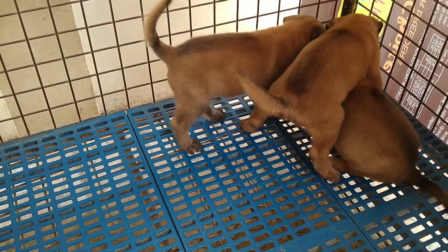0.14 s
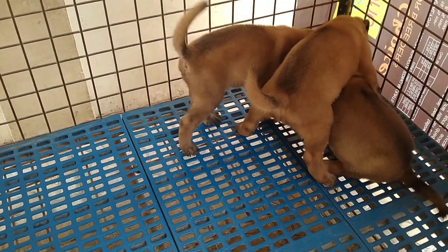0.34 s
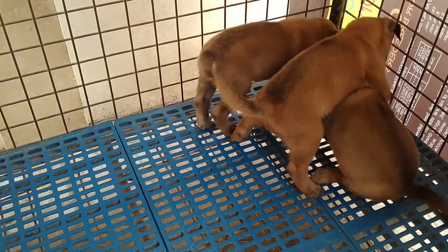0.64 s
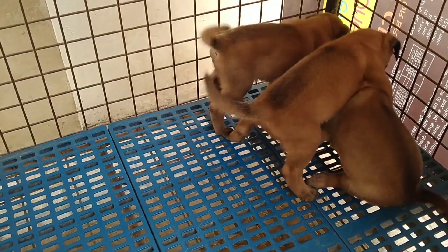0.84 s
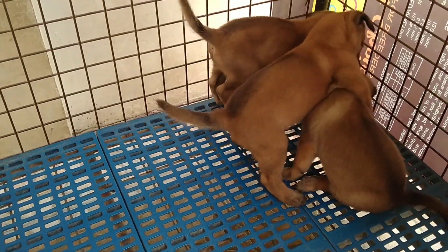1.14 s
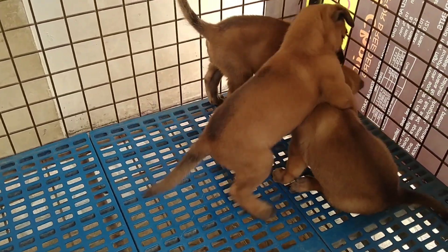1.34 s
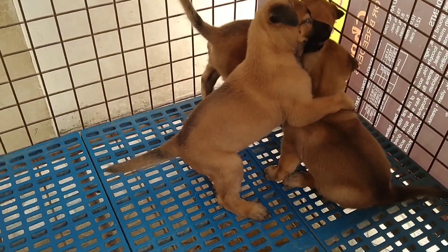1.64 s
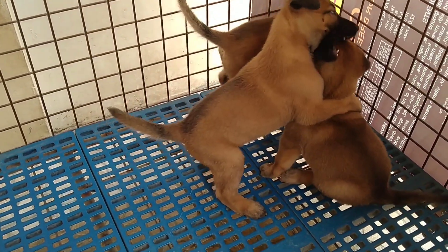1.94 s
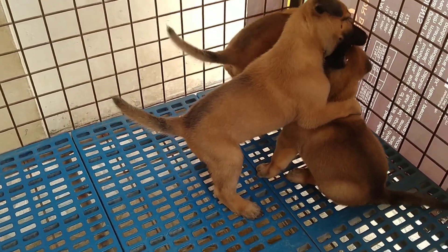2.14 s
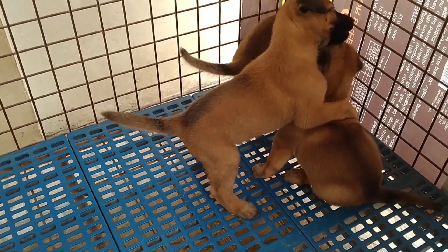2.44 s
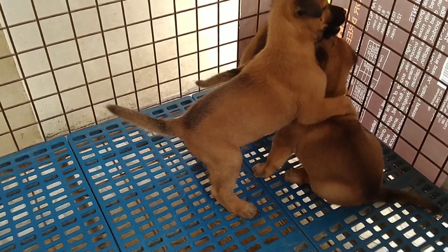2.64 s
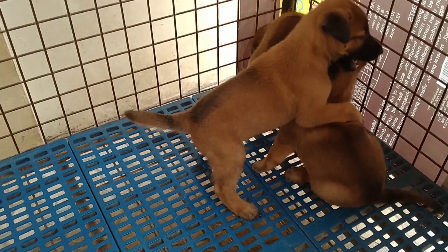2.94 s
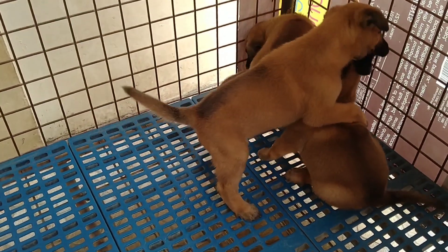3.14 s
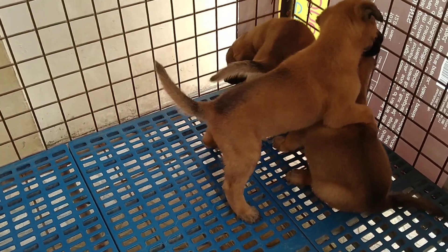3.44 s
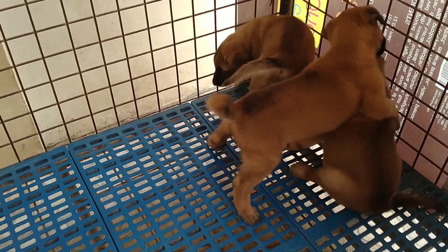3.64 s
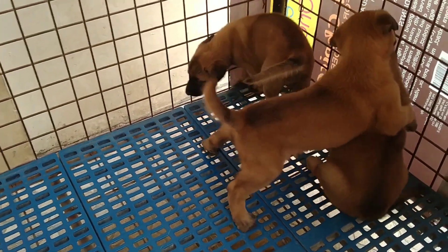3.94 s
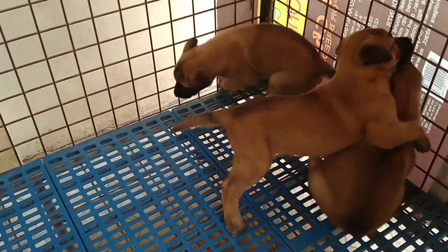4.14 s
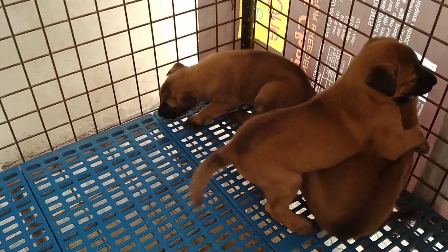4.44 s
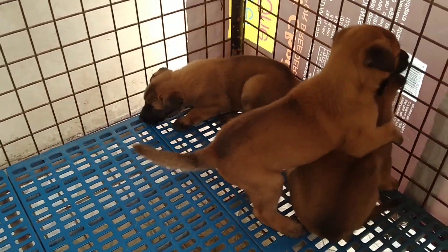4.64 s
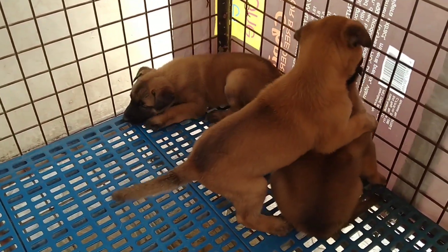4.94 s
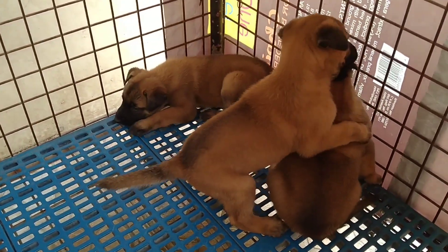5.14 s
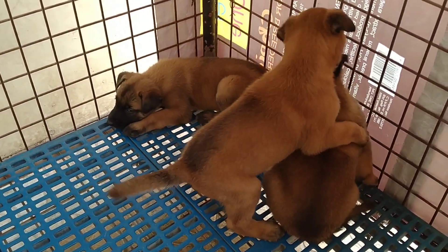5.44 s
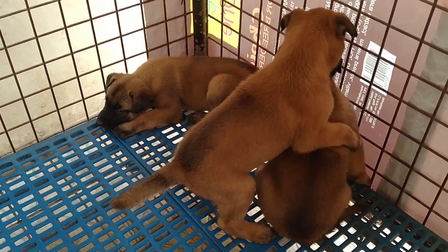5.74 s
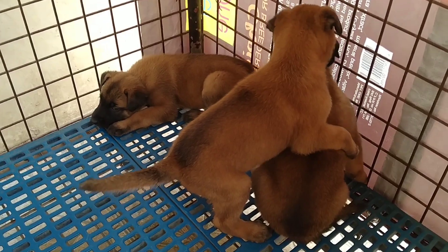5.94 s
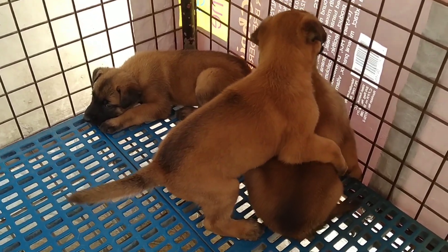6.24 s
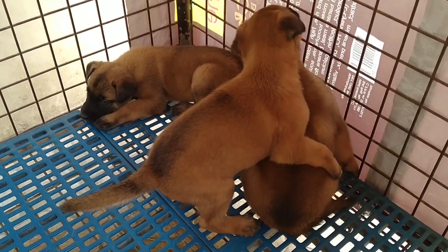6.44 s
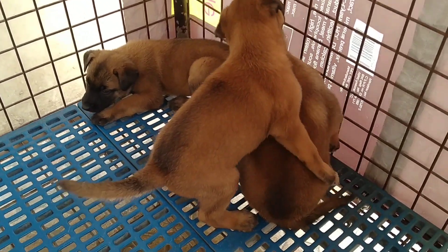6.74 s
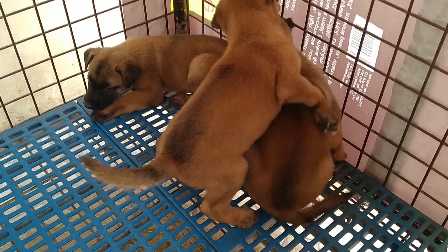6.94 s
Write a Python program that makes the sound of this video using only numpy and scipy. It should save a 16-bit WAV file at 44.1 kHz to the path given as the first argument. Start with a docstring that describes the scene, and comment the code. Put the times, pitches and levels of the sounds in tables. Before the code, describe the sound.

Low room rumble and faint hiss lie under a close view of puppies in a wire cage on a slatted plastic floor. For the first 2.5 seconds there are only light scuffs, a brighter scratch near 1.0, and barely audible squeaks. At about 2.6 a soft, toneless growl comes, with a thin high whistle. Short arching whines follow at 3.0 and 3.3, the second breaking hoarsely downward. Around 3.8 a hard, hollow double knock strikes the floor. A brief higher yelp sounds at 4.35, then growling and a broken, wavering whimper from 4.5 to 5.0 with a low floor rub. Weaker whimpers come at 5.2 and 5.65. Loud, clear whines arch up and fall at 6.0 and 6.4, with a small knock during the second; a softer one at 6.8 drops lower to end at about 7.1. A small room gives short reflections.

```python
"""A puppy whines in arching calls, with growls, squeaks, and paws that scuff, rub and knock on a plastic floor.
The voice is nearly a sine wave with weak harmonics. A thin whistle near 8-9 kHz is chopped by that voice.
Growls, hoarseness and scuffs are shaped noise; knocks are clicks followed by short floor rings.
A wire cage rings along, a small room answers, and low rumble and faint hiss lie underneath."""
import sys
import numpy as np
from scipy import signal
from scipy.fft import rfft, irfft, next_fast_len
from scipy.io import wavfile
from scipy.ndimage import uniform_filter1d, map_coordinates

SR = 44100
rng = np.random.default_rng(int(sys.argv[2]) if len(sys.argv) > 2 else 0)


def waveform_to_disk(signal):
    """Save audio, clipped to [-1, 1], as 16-bit WAV at the path in sys.argv[1]."""
    frames = np.transpose(np.atleast_2d(signal))
    scaled = np.clip(frames, -1, 1) * 32767
    samples = np.round(scaled).astype(np.int16)
    wavfile.write(sys.argv[1], SR, samples)


N = 312228  # length of the scene [samples]

# Colour of the low room rumble and the booming floor: (frequency [Hz], relative level [dB])
RUMBLE_COLOUR = [(35, -49.5), (60, -22.5), (110, -2), (170, -3), (260, -9.5), (400, -14), (600, -25.5),
                 (1500, -54)]
# Colour of the bright hiss in the air and the whistle: (frequency [Hz], relative level [dB])
FIZZ_COLOUR = [(2500, 3.5), (4500, 3.5), (7000, 3.5), (8600, 10), (10500, -1), (15000, 3.5)]
# Colour of rough breath in the throat: (frequency [Hz], relative level [dB])
THROAT_NOISE_COLOUR = [(300, -2), (650, -2), (950, -1.5), (1300, -4), (1800, -4.5), (2400, -12),
                       (3800, -20.5), (8000, -34.5)]


def amp(db):
    """Turn decibels into a gain."""
    return 10 ** (np.asarray(db) / 20)


def unit(x):
    """Scale a sound to an average strength (rms) of 1."""
    return x / np.sqrt(np.mean(x ** 2) + 1e-20)


def along(points, hz):
    """Read a curve of (frequency [Hz], value) points on a logarithmic frequency axis."""
    f, v = np.transpose(points)
    return np.interp(np.log(hz + 1), np.log(f + 1), v)


def wobble(rate):
    """Draw a smooth random curve through a given number of random points per second."""
    points = rng.standard_normal(int(N * rate / SR) + 4)
    return map_coordinates(points, [np.arange(N) * rate / SR])


def filtered(x, response):
    """Multiply the spectrum of a sound by a response that depends on frequency."""
    size = next_fast_len(N + SR // 2)
    hz = np.fft.rfftfreq(size, 1 / SR)
    return irfft(rfft(x, size) * response(hz), size)[:N]


def noise(colour):
    """Make noise of rms 1 with the given colour."""
    return unit(filtered(rng.standard_normal(N), lambda hz: amp(along(colour, hz))))


def impulse(colour, size=1024):
    """Make a pulse of peak 1 with the given colour, its energy packed as early as possible."""
    hz = np.fft.rfftfreq(size, 1 / SR)
    # folding the cepstrum forward in time gives the minimum-phase pulse
    cepstrum = irfft(np.log(amp(along(colour, hz))))
    cepstrum[1:size // 2] *= 2
    cepstrum[size // 2 + 1:] = 0
    pulse = irfft(np.exp(rfft(cepstrum)))
    return pulse / np.abs(pulse).max()


def add(track, s, sound):
    """Mix a sound into the track at time s [s]."""
    part = track[max(round(s * SR), 0):][:len(sound)]
    part += sound[:len(part)]


def swells(rows, rise, fall):
    """Build an envelope of (time [s], length [s], level [dB]) strokes that start softly and die away."""
    envelope, t = np.zeros(N), np.arange(SR // 2) / SR
    for s, length, db in rows:
        onset = 1 - np.exp(-t / rise)
        ending = np.exp(-np.maximum(t - length, 0) / fall)
        add(envelope, s, amp(db) * onset * ending)
    return envelope


def controls(calls, edge):
    """Turn calls into a soft on-off gate and one smoothed curve for each of their columns."""
    t = np.arange(N) / SR
    s, *columns = np.vstack(calls).T
    gate = sum((t > call[0][0]) & (t < call[-1][0] + edge / 2) for call in calls)
    tracks = [np.minimum(gate, 1.0)] + [np.interp(t, s, column) for column in columns]
    return [uniform_filter1d(track, max(int(edge * SR), 1)) for track in tracks]


def phase_of(hz):
    """Add up a pitch curve into a running phase [radians]."""
    return 2 * np.pi * np.cumsum(hz) / SR


def resonances(rows, hz):
    """Sum the responses of (frequency [Hz], width [Hz], level [dB]) resonances."""
    return sum(amp(db) * 1j * hz * width / (centre ** 2 - hz ** 2 + 1j * hz * width)
               for centre, width, db in rows)


def background(rumble_db=-53.0, fizz_db=-1):
    """Low room rumble under a faint hiss whose middle and treble drift slowly."""
    # Hiss levels, the treble before fizz_db is added: (time [s], middle [dB], treble [dB])
    hiss_levels = [(0, -66, -69), (2.6, -63, -73.5), (3.996, -59, -81.5), (6.501, -65, -116)]
    # Colour of the middle hiss: (frequency [Hz], relative level [dB])
    air_colour = [(300, -8.5), (700, 11), (1300, 4), (2200, 5), (3100, 0), (4000, -10.5), (6000, -20.5),
                  (10000, -31), (15000, -23)]
    s, middle_db, treble_db = np.transpose(hiss_levels)
    t = np.arange(N) / SR
    rumble = amp(rumble_db + 2.6 * wobble(2.486)) * noise(RUMBLE_COLOUR)
    air = amp(np.interp(t, s, middle_db) + 0.12 * wobble(6.5)) * noise(air_colour)
    fizz = amp(np.interp(t, s, treble_db) + fizz_db) * noise(FIZZ_COLOUR)
    return rumble + air + fizz


def room(x, delay=.005):
    """Scattered answer of the walls: a noise tail in which each frequency dies at its own speed."""
    # Echo times: (frequency [Hz], time to fall by 60 dB [s])
    echo_times = [(200, 0.66), (1200, 0.19), (4000, 0.35), (8000, 0.17), (15000, 0.042)]
    hz, t, z = signal.stft(rng.standard_normal(SR // 2), SR, nperseg=256)
    decay = amp(-60 * t / along(echo_times, hz)[:, None])
    tail = signal.istft(z * decay, SR, nperseg=256)[1]
    tail = np.pad(tail / np.linalg.norm(tail), (int(delay * SR), 0))
    return signal.fftconvolve(x, tail)[:N]


def scuffs(grain_db=3.0, boom_db=-1):
    """Grainy friction: each stroke has a bright hiss and a duller scrape, which also makes the floor boom."""
    # Mostly paws and fur brushing floor and wire; the first row is a short burst of noise at the very start:
    # (time [s], length [s], hiss level [dB], scrape level [dB])
    strokes = [(0, 0.012, -63.5, -50.5), (0.124, 0.0032, -48, -54), (0.742, 0.031, -62.5, -63),
               (1.038, 0.014, -42.5, -53.5), (1.088, 0.0063, -50, -57), (1.362, 0.018, -52, -60.5),
               (1.527, 0.013, -54.5, -59), (2.16, 0.074, -59, -57.5), (2.38, 0.06, -68, -61.5),
               (2.789, 0.031, -53, -50), (3.284, .016, -65.5, -55.5), (3.607, 0.023, -62, -53),
               (3.872, 0.02, -75, -46), (4.245, 0.0082, -64, -49), (4.281, 0.077, -74.5, -56.5),
               (4.373, 0.036, -84, -47), (4.839, 0.042, -62.5, -45.5)]
    # Colours of the hiss and the scrape: (frequency [Hz], relative level [dB])
    hiss_colour = [(2000, -53), (5000, -4.5), (7000, 0.5), (8700, 8.5), (10500, -3.5), (15000, -4.5)]
    scrape_colour = [(200, 2), (700, -3), (1800, 9.5), (3200, 2), (5000, -6.5), (8000, -15.5),
                     (14000, -17.5)]
    rows = np.array(strokes)
    hiss = swells(rows[:, :3], rise=0.0014, fall=0.0084) * noise(hiss_colour)
    push = swells(rows[:, [0, 1, 3]], rise=0.0016, fall=0.015)
    grains = unit(amp(grain_db * wobble(500)))
    boom = amp(boom_db) * push * noise(RUMBLE_COLOUR)
    return (hiss + push * noise(scrape_colour)) * grains + boom


def floor_rub(start=4.845, length=0.12, pitch_hz=222, db=-39, octave_db=-13):
    """A low floor hum as a paw rubs it under a long whine: a tone and its octave, uneven in pitch and level."""
    phase = phase_of(pitch_hz * (1 + .13 * wobble(170)))
    tone = np.sin(phase) + amp(octave_db) * np.sin(2 * phase)
    tone = unit(tone * amp(2.2 * wobble(110)))
    return swells([(start, length, db)], rise=0.0027, fall=0.03) * tone


def knocks(attack=0.0013):
    """Each blow clicks, then the floor rings; the weight on it damps and detunes the ring."""
    # Blows on the plastic floor:
    # (time [s], thud gain [dB], ring time to fall by 60 dB [s], pitch factor, click peak [dB])
    blows = [(2.796, -4.5, 0.0072, 1.02, -35), (2.9303, -21, 0.029, 1.47, -41),
             (3.595, -31, 0.033, 0.76, -31.5), (3.651, -48, 0.025, 1.4, -23.5),
             (3.7859, -23, 0.064, 1.7, -28), (3.8021, 3, 0.052, 1.03, -10),
             (3.8597, -16.5, 0.035, 1.346, -14), (4.249, -62, 0.03, 1.7, -31.5),
             (5.519, -61.5, 0.021, 2.4, -38), (6.422, -21.5, 0.015, 1.38, -21)]
    # Ways the floor rings, before the pitch factor: (frequency [Hz], level [dB], share of the ring time)
    floor_modes = [(238.7, 2, 0.69), (315.4, -6.5, 0.73), (408, -6.5, 0.54)]
    # Colour of the click: (frequency [Hz], relative level [dB])
    click_colour = [(150, 6.5), (600, -2), (1200, 1.5), (2000, -0.5), (3300, -12), (4300, -32.5),
                    (8000, -44.5), (15000, -48)]
    out, t = np.zeros(N), np.arange(SR // 4) / SR
    click = impulse(click_colour)
    for s, thud_db, t60, stretch, click_db in blows:
        ring = sum(amp(db - 60 * t / (t60 * share)) * np.sin(2 * np.pi * hz * stretch * t)
                   for hz, db, share in floor_modes)
        add(out, s, amp(thud_db) * ring * (1 - np.exp(-t / attack)))
        # the click is a burst of noise that falls by 60 dB in 11 ms
        burst = rng.standard_normal(len(t)) * amp(-60 * t / 0.011)
        chatter = signal.fftconvolve(burst, click)
        add(out, s, amp(click_db) * chatter / np.abs(chatter).max())
    return out


def squeaks():
    """Thin gliding tones; the more unsteady ones blur into a wheeze."""
    # Faint squeaks and wheezes: (time [s], length [s], start pitch [Hz], end pitch [Hz],
    #  unsteadiness [share of the pitch], level [dB])
    glides = [(0.626, 0.09, 5090, 4120, 0.04, -62), (0.681, 0.115, 4210, 4000, 0.024, -64),
              (1.27, 0.26, 848, 820, 0.022, -67), (2.383, 0.032, 6600, 3240, 0.23, -57.5),
              (2.651, 0.05, 1930, 1920, 0.022, -50), (2.992, 0.13, 3820, 3600, .015, -68.5),
              (3.198, 0.14, 2950, 2990, 0.0147, -59.5), (5.616, 0.12, 3696, 3630, .01, -71.5),
              (6.31, 0.049, 3900, 2988, 0.14, -68.5), (6.697, 0.052, 3342, 2700, 0.14, -64.5)]
    out, waver = np.zeros(N), wobble(1300)
    for s, length, start_hz, end_hz, unsteady, db in glides:
        n = int(length * SR)
        pitch = np.geomspace(start_hz, end_hz, n) * (1 + unsteady * waver[round(s * SR):][:n])
        add(out, s, amp(db) * np.sqrt(2) * signal.windows.tukey(n, .5) * np.sin(phase_of(pitch)))
    return out


def growl(shifting_db=2):
    """Lumpy air through a nearly closed mouth, whose resonances come and go as the jaw works."""
    # Soft, toneless growls: (time [s], length [s], level [dB])
    strokes = [(2.605, 0.039, -43.5), (2.64, 0.14, -45.5), (2.82, 0.19, -51), (4.465, 0.02, -41.5),
               (4.6, .12, -43.5), (4.78, 0.18, -53), (6.545, 0.053, -42)]
    # Resonances of the mouth: (frequency [Hz], width [Hz], level [dB])
    mouth_modes = [(750, 140, -3.5), (982, 140, 4), (1260, 150, -2), (2330, 880, -5)]
    air = rng.standard_normal(N) * amp(2.5 * wobble(220))
    mouth = np.zeros(N)
    for row in mouth_modes:
        band = filtered(air, lambda hz: amp(along(THROAT_NOISE_COLOUR, hz)) * resonances([row], hz))
        mouth += amp(shifting_db * wobble(25)) * band
    return swells(strokes, rise=.025, fall=.02) * unit(mouth)


def rasp(hoarse, voice_phase):
    """Turbulence in the throat where the voice breaks up: uneven puffs as the vocal folds open."""
    puffs = (1 + .5 * np.cos(voice_phase)) * amp(2.5 * wobble(260))
    air = rng.standard_normal(N) * puffs
    return hoarse * unit(filtered(air, lambda hz: amp(along(THROAT_NOISE_COLOUR, hz))))


def peeps(unsteady=0.018, octave_db=-24, sag=0.02):
    """The whistle flares alone as the voice lets go: short tones that fall by a small share of their pitch."""
    # Short peeps: (time [s], length [s], middle pitch [Hz], level at the peak of the swell [dB])
    flares = [(3.134, 0.036, 8060, -36.5), (3.535, 0.017, 8000, -42.5), (3.868, 0.048, 7450, -47),
              (5.011, 0.018, 7640, -45.5), (6.199, 0.025, 7700, -55.5), (6.595, 0.027, 7850, -49.5)]
    out, waver = np.zeros(N), 1 + unsteady * wobble(600)
    for s, length, hz, db in flares:
        n = int(length * SR)
        falling = 1 + sag * np.linspace(.5, -.5, n)
        phase = phase_of(hz * falling * waver[round(s * SR):][:n])
        tone = np.sin(phase) + amp(octave_db) * np.sin(2 * phase)
        add(out, s, amp(db) * np.sqrt(2) * signal.windows.hann(n) * tone)
    return out


def whistle_gesture(s, length, start_hz, end_hz, settles, start_db, end_db, lower_db, upper_db, count=48):
    """A scoop and an S-shaped fall: (time [s], pitch [Hz], tone, lower and upper sidebands [dB])."""
    onset_db, attack_s = 12.5, 0.058  # it swells from this far below its level, at this speed
    scoop = 0.03  # share of the pitch by which it starts flat
    u = np.linspace(0, 1, count)
    starting = np.exp(-u * length / attack_s)
    fall = np.sin(np.pi / 2 * np.minimum(u / settles, 1)) ** 2
    pitch = start_hz + (end_hz - start_hz) * fall / fall[-1]
    pitch = pitch * (1 - scoop * starting ** 2)
    swell = -onset_db * starting
    tone_db = start_db + (end_db - start_db) * u + swell
    return np.column_stack([s + u * length, pitch, tone_db, lower_db + swell, upper_db + swell])


def whistle(voice_phase, voiced, flutter_db=2.5, octave_db=-13, octave_bands_db=-5, patchy_db=3, hiss_db=-19):
    """A very high tone; the vibrating folds chop it and its octave into sidebands one voice pitch apart."""
    # Sinking whistles, before the soft, flat start: (time [s], length [s], start pitch [Hz], end pitch [Hz],
    #  point where the fall would level out [call lengths], start level [dB], end level [dB],
    #  lower sideband [dB], upper sidebands before the nose [dB])
    falls = [(2.628, 0.15, 8700, 8520, 1, -65, -60, -75, -97),
             (3.01, 0.13, 8800, 8060, .95, -64.5, -36, -56.5, -78),
             (3.333, 0.165, 8430, 8020, 1.7, -39.5, -46, -49, -71),
             (4.287, 0.1, 8460, 8020, 1.5, -57.5, -54.5, -90, -106),
             (4.743, 0.26, 9440, 8450, 2.5, -58.5, -70, -72.5, -74),
             (5.288, 0.1, 9020, 8450, 2.6, -62.5, -67, -68.5, -90),
             (5.636, 0.15, 8920, 7750, 2.9, -63, -66.5, -78, -101),
             (5.988, 0.215, 9150, 8100, 0.98, -72, -70.5, -74, -71.5),
             (6.385, 0.21, 9340, 8050, 1.05, -74, -73, -74, -71.5),
             (6.784, 0.18, 9170, 8200, 0.84, -68, -87, -74.5, -73.5)]
    # How the nose colours the sidebands: (frequency [Hz], gain [dB])
    nose = [(9200, -9), (10400, 10.5), (11600, -1.5), (13800, -15), (15000, -8.5)]
    calls = [whistle_gesture(*row) for row in falls]
    gate, pitch, tone_db, lower_db, upper_db = controls(calls, edge=0.012)
    phase = phase_of(pitch * (1 + .0025 * wobble(300) + .005 * wobble(30)))
    carrier, below = np.exp(1j * phase), voiced * np.exp(-1j * voice_phase)
    sound = (amp(tone_db) + amp(lower_db) * below) * carrier
    sound = sound * (1 + amp(octave_db) * carrier * below)
    # lines above the whistle and below its octave flare as they pass the resonances of the nose
    for order in range(1, 4):
        above_tone = phase + order * voice_phase
        below_octave = 2 * phase - order * voice_phase
        for line, db in [(above_tone, 0), (below_octave, octave_bands_db)]:
            line_hz = np.abs(np.gradient(line)) * SR / (2 * np.pi)
            line_db = upper_db + db + along(nose, line_hz) + patchy_db * wobble(45)
            sound += voiced * amp(line_db) * np.exp(1j * line)
    # the air jet is turbulent: every line has a noisy skirt, over a breathy hiss
    skirt = 1 + .25 * (wobble(700) + 1j * wobble(700))
    hiss = (amp(tone_db + hiss_db) + .5 * voiced * amp(upper_db)) * noise(FIZZ_COLOUR)
    tones = np.sqrt(2) * amp(flutter_db * wobble(110)) * (sound * skirt).imag
    return gate * (tones + hiss)


def whine_gesture(s, length, start_hz, top_hz, end_hz, rising, bend, db, fade_db, droop_db,
                  second_db, upper_db, count=48):
    """One bend of the voice: (time [s], pitch [Hz], fundamental, second and upper harmonics [dB])."""
    # A lower voice is more pressed: (pitch [Hz], second harmonic relative to the fundamental [dB])
    pressed = [(750, -0.5), (880, -6.5), (1050, -9), (1250, -27), (1450, -24)]
    onset_db, attack_s = 14, 0.0069  # a whine swells from this far below its level, at this speed
    rise_bend = 1.6  # power by which the pitch flattens out towards its top
    upper_follows = 0.61  # share of the swell and fade that the upper harmonics follow
    u, top = np.linspace(0, 1, count), np.clip(rising, 1e-3, 1 - 1e-3)
    rise, fall = np.maximum(1 - u / top, 0), np.maximum((u - top) / (1 - top), 0)
    pitch = top_hz + (start_hz - top_hz) * rise ** rise_bend + (end_hz - top_hz) * fall ** bend
    effort_db = -fade_db * (u - .5) - droop_db * (2 * u - 1) ** 2
    effort_db = effort_db - onset_db * np.exp(-u * length / attack_s)
    first_db = db + effort_db
    second = first_db + along(pressed, pitch) + second_db
    return np.column_stack([s + u * length, pitch, first_db, second, upper_db + upper_follows * effort_db])


def crack_gesture(s, db):
    """A short, pressed drop of the voice, in the same columns as a whine."""
    length, pitch_hz, sag, upper_db = 0.011, 943, .08, -41  # [s], [Hz], share it falls, [dB]
    return np.array([(s + u * length, pitch_hz * (1 - sag * u), db, db, db + upper_db) for u in (0, 1)])


def closure_blur(rough):
    """Random phase scatter of a harmonic [radians]; it grows with hoarseness."""
    return (.22 + .8 * rough) * wobble(350)


def voice(hoarse, rough_db=5.0, patchy_db=4.0):
    """Vocal folds: almost a sine, more ragged where they turn hoarse. Gives sound, phase and gate."""
    # Whines; a new row starts where the voice breaks to another pitch: (time [s], length [s],
    #  start pitch [Hz], top pitch [Hz], end pitch [Hz], share of the length spent rising,
    #  bend of the fall [power], middle level before the soft start [dB],
    #  fade from start to end [dB], droop at both ends [dB],
    #  second harmonic boost [dB], upper harmonics before the throat [dB])
    whines = [(3.014, 0.13, 1028, 1212, 1061, 0.47, 1.34, -34, -12, 11, -11, -62),
              (3.326, 0.15, 1025, 1297, 1005, 0.52, 1.8, -33, -9, 1.5, -2.5, -67),
              (3.483, 0.061, 953, 912, 743, 0.0065, 1.6, -30.5, 16.5, 8.5, -3.5, -51.5),
              (3.858, .028, 890, 884, 855, 0, 1.03, -39.5, 12, -3, 11.5, -58),
              (4.342, 0.039, 1366, 1366, 1265, 0.11, 1.56, -26, 3, 14, -16, -76),
              (4.552, .046, 848.5, 867.6, 950, 0.32, 1.31, -36, -5, 3, 2.5, -54.5),
              (4.6, 0.14, 957.4, 1015, 1050, 0.55, 2.2, -44, 16.5, -7, -12, -50.5),
              (4.734, 0.031, 1037, 1049, 1055, 0, 1.02, -33.5, 14, 0, -3, -65),
              (4.767, .056, 1230, 1251, 1244, 0.62, 1.1, -48, 0, 0, 21, -64),
              (4.83, 0.18, 1220, 1219, 1116, 0.0024, 0.4, -39, 20.5, -3, -3, -63.5),
              (5.204, 0.15, 676, 1072, 1049, 0.8, 0.76, -46, 4, -7, 1.5, -69.5),
              (5.658, 0.052, 1025, 1028, 1272, 0, 2.25, -52, 18, -2, -3.5, -82),
              (6.021, 0.17, 1354, 1414, 1172, 0.22, 1.8, -20.5, -0.5, 13.5, -8, -60.5),
              (6.409, 0.19, 1225, 1484, 1133, 0.28, 1.1, -21.5, 8.5, 10, -1, -62.5),
              (6.804, 0.11, 1030, 1355, 1133, 0.52, 1.2, -27, -3.5, 4.5, -2, -66.5),
              (6.926, 0.15, 995, 951, 784.6, 0.066, 0.51, -34.5, -1, 0, 0.5, -55.5)]
    # The voice cracks to a lower pitch for a moment: (time [s], level [dB])
    cracks = [(5.003, -42.5), (6.199, -47), (6.6, -49)]
    # How the throat colours the upper harmonics: (frequency [Hz], gain [dB])
    throat = [(2400, -2), (3000, 2), (3700, -14), (4300, -1.5), (4750, -9), (5100, -3), (5700, -14.5),
              (6050, -25.5), (6600, -16), (7100, -29.5)]
    ragged_at_db = -47  # hoarseness at which the folds are half out of control
    jitter, ragged_jitter = .002, .022  # pitch unsteadiness of a clear and a ragged voice [shares]
    shimmer_db, upper_patchy_db = .9, 4.5  # unsteadiness of the whole level and of each upper harmonic
    ragged_bright_db = -5  # gain of the harmonics above the third in a ragged voice
    upper_slope_db = 1.5  # each harmonic above the third is this much weaker

    calls = [whine_gesture(*row) for row in whines] + [crack_gesture(*row) for row in cracks]
    calls = sorted(calls, key=np.ndarray.tolist)
    gate, pitch, first_db, second_db, upper_db = controls(calls, edge=0.005)
    rough = hoarse ** 2 / (hoarse ** 2 + amp(ragged_at_db) ** 2)
    phase = phase_of(pitch * (1 + jitter * wobble(200) + ragged_jitter * rough * wobble(450)))
    fundamental = amp(first_db) * np.sin(phase)
    second = amp(second_db + patchy_db * wobble(70)) * np.sin(2 * phase + closure_blur(rough))
    sound = fundamental + second
    # no two closures of the folds are alike, which blurs the harmonics and makes them come and go
    for order in range(3, 9):
        db = upper_db + ragged_bright_db * rough * (order > 3) - upper_slope_db * (order - 3)
        db = db + along(throat, order * pitch) + upper_patchy_db * wobble(45)
        sound += amp(db) * np.sin(order * phase + closure_blur(rough))
    flutter = amp(shimmer_db * wobble(60) + rough_db * rough * wobble(170))
    return np.sqrt(2) * gate * flutter * sound, phase, gate


def scene(wet_db=-10.0, whistle_wet_db=-11, knock_wet_db=-36, lowest_hz=140):
    """Puppies in the room; knocks are close and nearly dry, and the slatted floor radiates little deep bass."""
    # Hoarse stretches of the voice: (time [s], length [s], level [dB])
    hoarse_stretches = [(3.458, 0.017, -45.5), (3.492, 0.065, -52), (3.862, 0.012, -45.5),
                        (4.385, 0.027, -43), (4.558, 0.045, -44.5), (4.737, 0.023, -39),
                        (5.21, 0.046, -57.5), (6.195, 0.01, -52), (6.555, 0.04, -52.5)]
    # The cage corner rings on when a whine sweeps through these: (frequency [Hz], width [Hz], level [dB])
    cage_modes = [(860, 4.3, -23.5), (1210, 22, 0), (1700, 14, -4)]
    hoarse = swells(hoarse_stretches, rise=0.0024, fall=0.017)
    whine, phase, voiced = voice(hoarse)
    calls = filtered(whine + rasp(hoarse, phase), lambda hz: 1 + resonances(cage_modes, hz))
    puppies = calls + growl() + floor_rub() + squeaks() + scuffs()
    high = whistle(phase, voiced) + peeps()
    bass_cut = signal.butter(2, lowest_hz, "highpass", fs=SR, output="sos")
    blows = signal.sosfilt(bass_cut, knocks())
    # the whistle and the other puppy sounds return from the walls far more than the knocks do
    answer = room(amp(wet_db) * puppies + amp(whistle_wet_db) * high + amp(knock_wet_db) * blows)
    return puppies + high + blows + answer + background()


def record(dry):
    """The microphone weakens the deepest bass; peaks clip at full scale and the top of the treble is cut."""
    top_hz = 15750
    bass_cut = signal.butter(2, 55, "highpass", fs=SR, output="sos")
    heard = signal.sosfilt(bass_cut, dry)
    return filtered(np.clip(heard, -1, 1), lambda hz: hz < top_hz)


dry = scene()
out = record(dry)
waveform_to_disk(out)
```